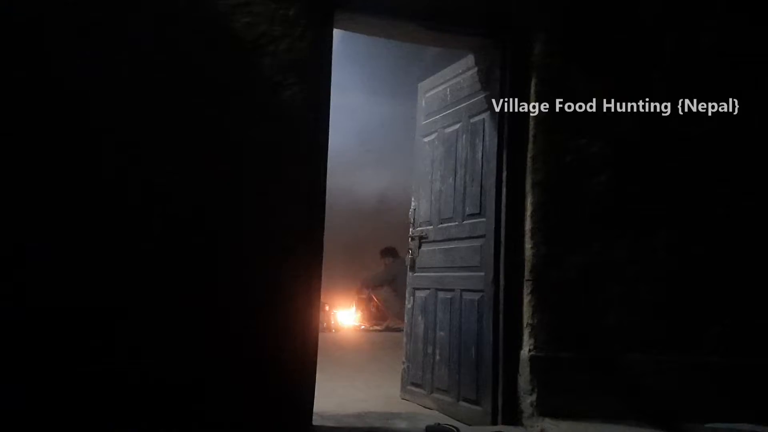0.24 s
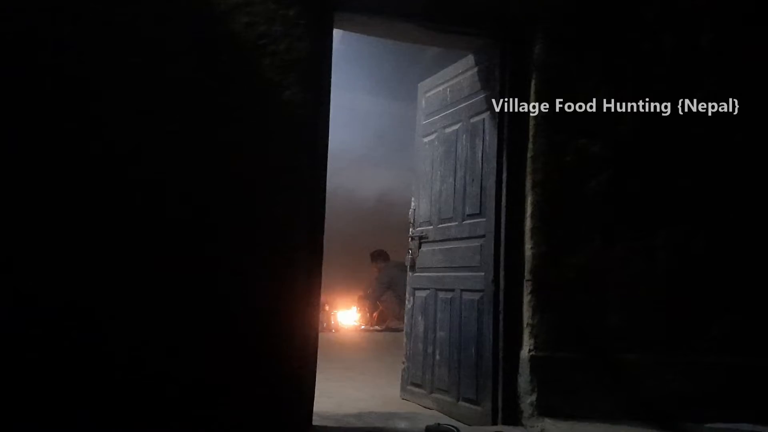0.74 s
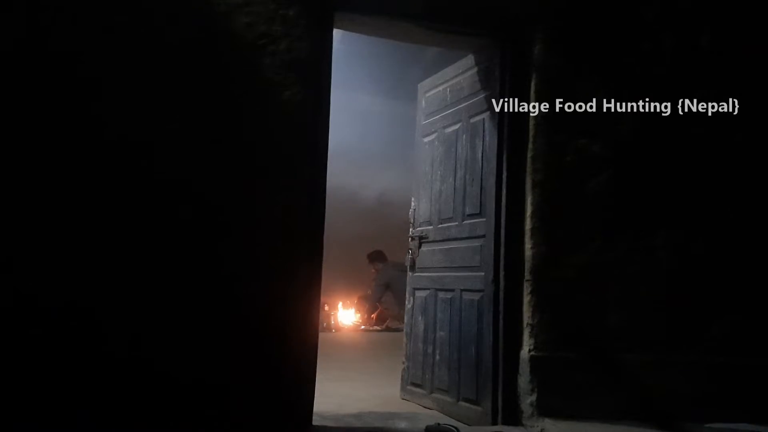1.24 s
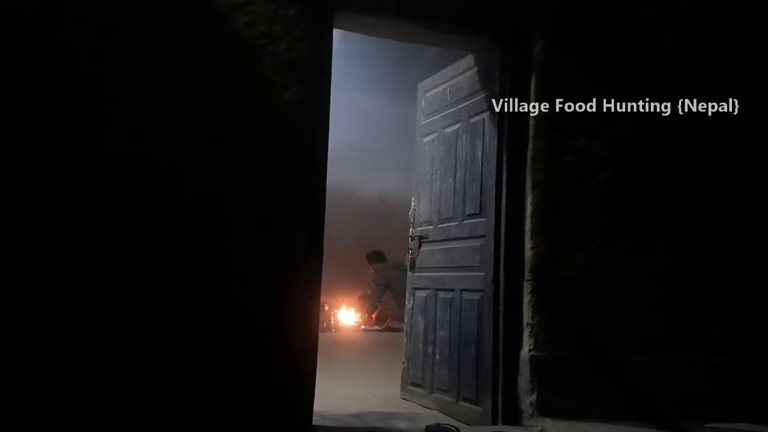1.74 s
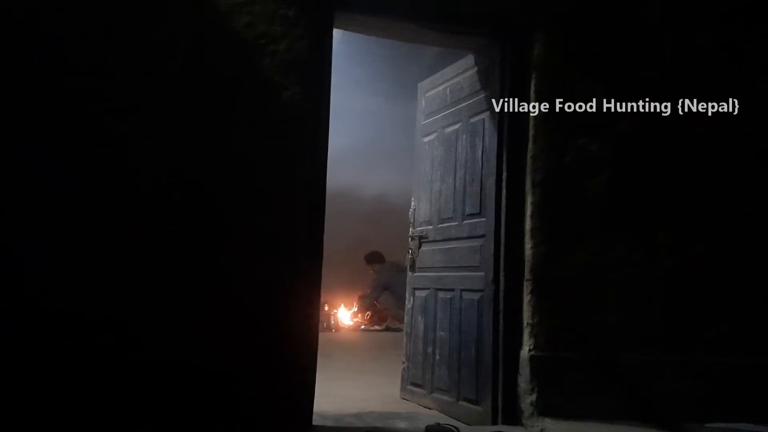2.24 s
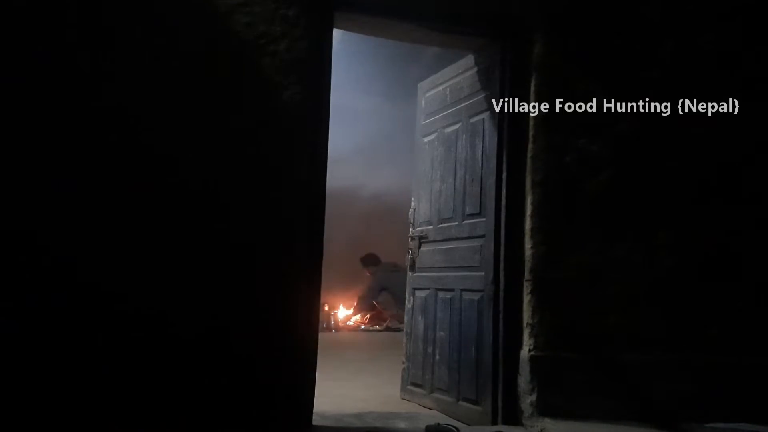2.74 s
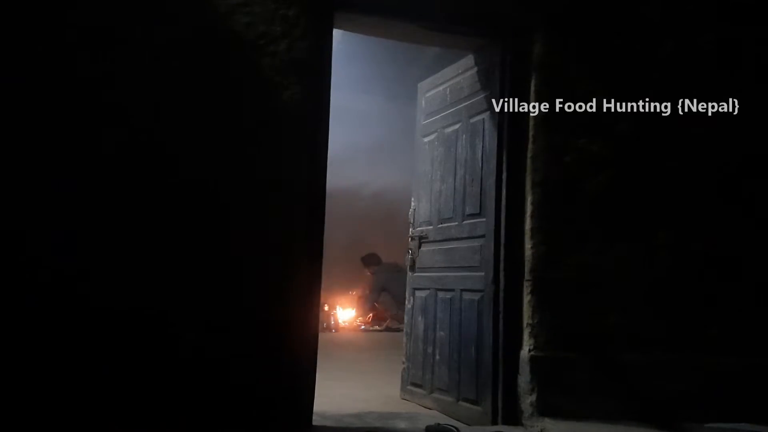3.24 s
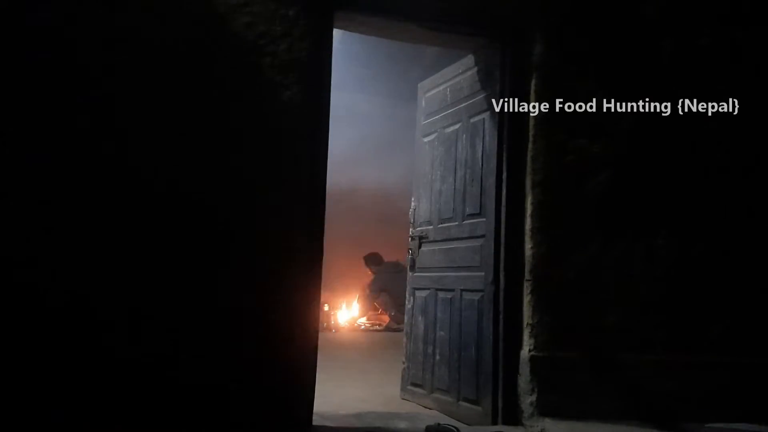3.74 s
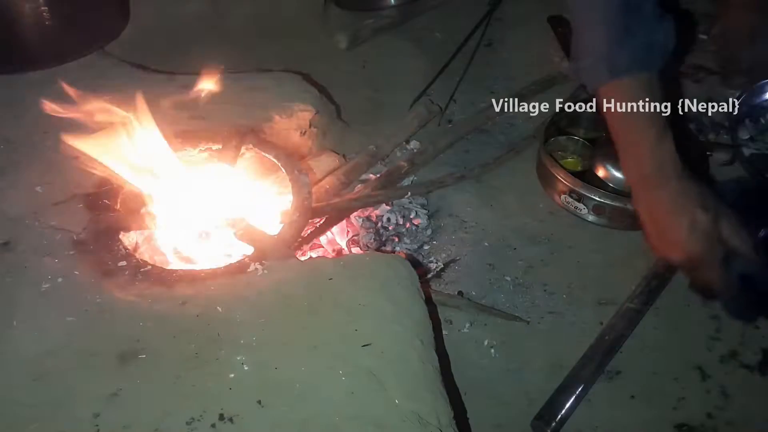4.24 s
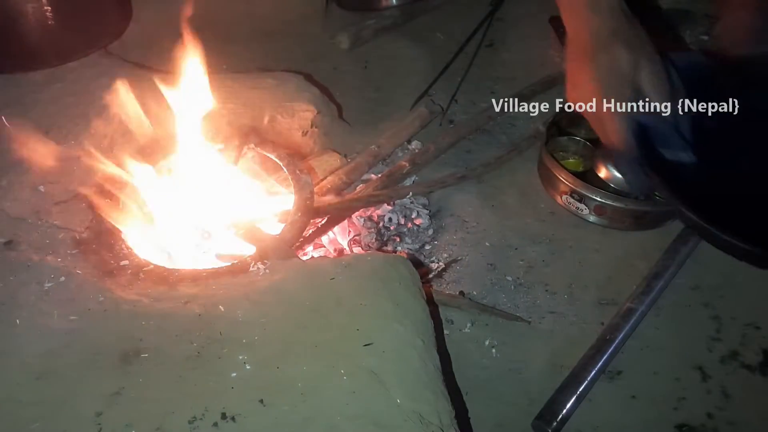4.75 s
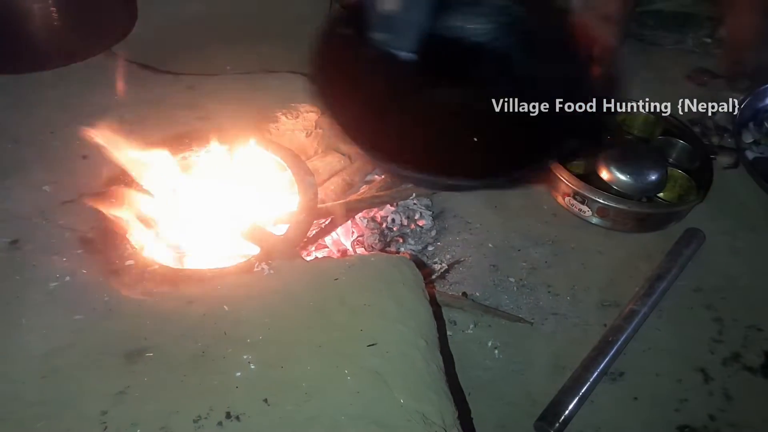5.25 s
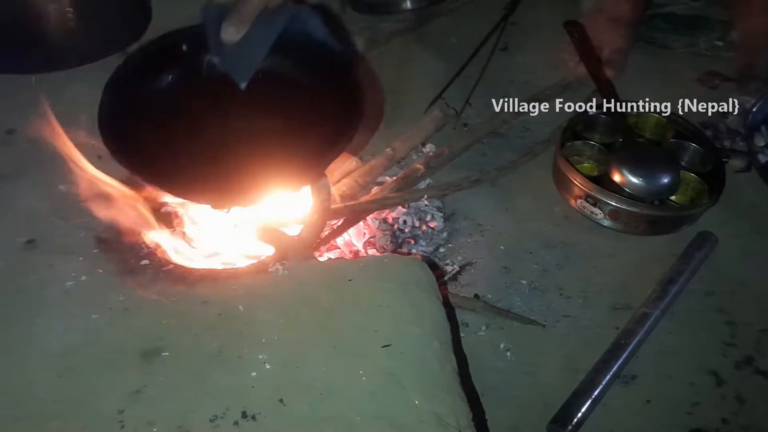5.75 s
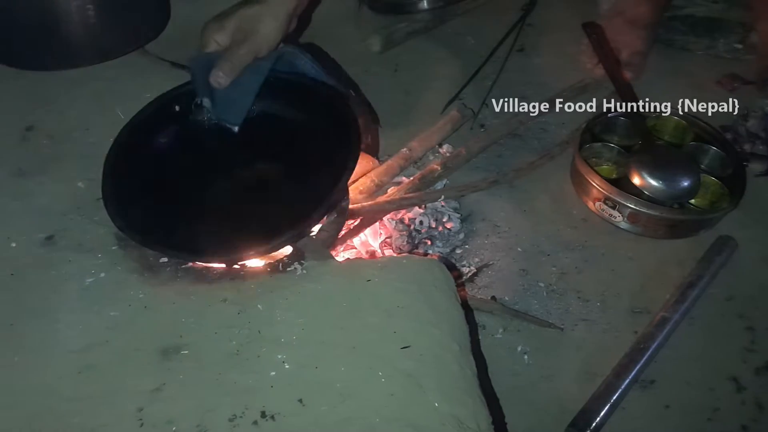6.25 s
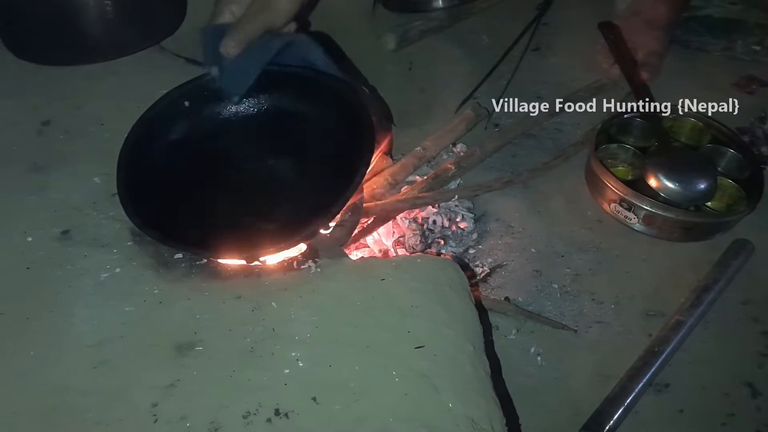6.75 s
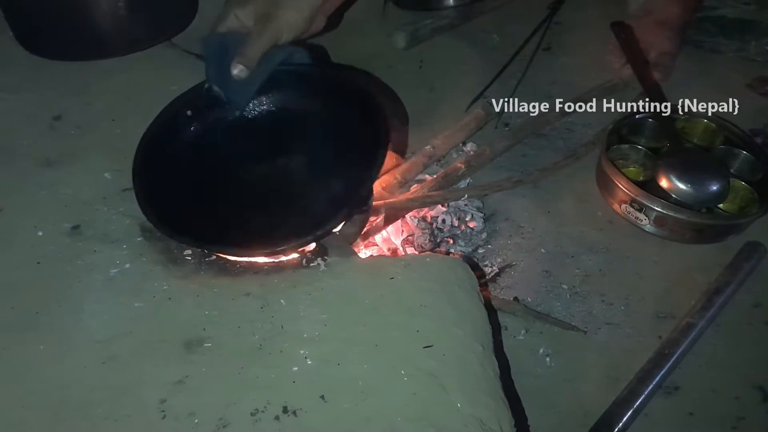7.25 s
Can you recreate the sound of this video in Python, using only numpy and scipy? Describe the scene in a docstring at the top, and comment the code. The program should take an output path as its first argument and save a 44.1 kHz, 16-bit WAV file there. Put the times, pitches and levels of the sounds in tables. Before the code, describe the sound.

Three listening places follow with hard cuts. First a moment of loud hissing at the pot; then distant, very faint fire under chirping crickets, with scattered crackles and soft bumps; last, close hissing flames. There an ember snaps loudly, a pan swishes as it is lifted, then knocks hollowly on the stove, rasps and sings in short drags. Stereo pickup outdoors at night, then near in a small earthen kitchen.

```python
"""A wood fire in a clay kitchen at night, heard from three places: beside the hissing pot, outside the
door with crickets over the faint fire, then close to the flames, where an ember cracks and an iron pan is
swung over, set down and dragged. Fire, rustle and thuds are shaped noise, crickets sliding sine strokes,
pops noise bursts in a room; grit clicks and blows ring the modes of the pan, which also sings."""
import sys
import numpy as np
from scipy import signal
from scipy.fft import rfft, irfft, next_fast_len
from scipy.io import wavfile
from scipy.ndimage import uniform_filter1d

SR = 44100
rng = np.random.default_rng(int(sys.argv[2]) if len(sys.argv) > 2 else 0)


def to_wav(sig):
    """Store sig (one row per channel, or 1-D mono) as 16-bit WAV at the path in sys.argv[1].

    Samples outside -1..1 are clipped; the rate is SR.
    """
    pcm = np.clip(np.atleast_2d(sig), -1, 1) * 32767
    pcm = np.round(pcm).astype(np.int16)
    wavfile.write(sys.argv[1], SR, pcm.T)  # frames by channels


N = 330730
T = np.arange(N) / SR  # time [s]
M = next_fast_len(N + 8192)  # transform length, padded for tails
HZ = np.maximum(np.arange(M // 2 + 1) * SR / M, 1)  # spectral lines [Hz]

CLOSE_END_S, NEAR_START_S = 0.079, 4.223  # the listening place changes
ROOM_T60_S, ROOM_GAP_S = 0.23, 0.0028  # usual decay, and the silence before the first reflection
EAR_LAG = 9  # samples by which the pan reaches the right ear later


def undb(db):
    """Decibels to gain."""
    return 10 ** (np.asarray(db) / 20)


def unit(x):
    """Scale to rms 1."""
    return x / np.sqrt(np.mean(x ** 2))


def over_hz(table):
    """A (frequency [Hz], value) table read at every spectral line, on a log frequency axis."""
    hz, value = np.transpose(table)
    return np.interp(np.log(HZ), np.log(hz), value)


def colour(x, table, lo_hz=1, hi_hz=3e4):
    """Shape by a spectrum, keeping one band of it."""
    keep = 1 / np.sqrt((1 + (lo_hz / HZ) ** 12) * (1 + (HZ / hi_hz) ** 12))
    return irfft(rfft(x, M) * undb(over_hz(table)) * keep, M)[..., :N]


def band_only(x, lo_hz=1, hi_hz=3e4):
    """Keep one band, with a flat spectrum inside it."""
    return colour(x, [(1, 0), (SR, 0)], lo_hz, hi_hz)


def gains(rows):
    """Level columns of a curve as gains in time; silent outside it."""
    s, *columns = np.transpose(rows)
    return [undb(np.interp(T, s, c, -200, -200)) for c in columns]


def held(table, start_s, end_s):
    """Gains of a curve between two times, its end values held; silent outside them."""
    s, *columns = np.transpose(table)
    return [undb(np.interp(T, s, c)) * (T >= start_s) * (T < end_s) for c in columns]


def walk(rate):
    """Random levels held 1 / rate s and slewed twice; spread near 1."""
    k = int(SR / rate)
    steps = np.repeat(rng.standard_normal(N // k + 1), k)
    return 1.33 * uniform_filter1d(uniform_filter1d(steps, k), k)[:N]


# likeness of the two ears: (frequency [Hz], correlation)
EAR_LIKENESS = [(60, 0.75), (250, 0.52), (640, 0.21), (1400, -0.1), (3000, 0.087), (15000, -0.046)]


def pair(a, b):
    """Spectra of left and right from two unrelated signals, alike mostly in the bass."""
    c = np.clip(over_hz(EAR_LIKENESS), -1, 1)
    mid = rfft(a, M) * np.sqrt((1 + c) / 2)
    side = rfft(b, M) * np.sqrt((1 - c) / 2)
    return np.array([mid + side, mid - side])


def ring(x, hz, t60):
    """One decaying mode; a unit click rings with amplitude near 1."""
    r, w = np.exp(-np.log(1000) / (t60 * SR)), 2 * np.pi * hz / SR
    return signal.lfilter([0, r * np.sin(w)], [1, -2 * r * np.cos(w), r * r], x)


def add(out, s, piece):
    """Mix a piece in at a time."""
    i = int(s * SR)
    out[..., i:i + piece.shape[-1]] += piece[..., :N - i]


def room(x, t60=ROOM_T60_S):
    """Diffuse answer of the walls as decaying noise, energy near 1, different at each ear."""
    t = T[:SR // 2]
    decay = undb(-60 * t / t60) * (t > ROOM_GAP_S)
    tail = rng.standard_normal((2, N)) * np.pad(decay, (0, N - len(t)))
    return irfft(rfft(x, M) * pair(*tail), M)[:, :N] / np.sqrt(np.sum(tail[0] ** 2))


def air(flicker_db, sputter_db):
    """White stereo noise whose half-octave bands flicker alone and sputter together."""
    both, out, sputter = pair(*rng.standard_normal((2, N))), 0, walk(30)
    for octave in np.arange(4, 14.6, .5):
        share = np.cos(np.pi * np.clip(np.log2(HZ) - octave, -.5, .5)) ** 2
        level = undb(flicker_db * walk(10) + sputter_db * sputter)
        out = out + level * irfft(both * share, M)[:, :N]
    return out


def patchy(x, depth_db, width_hz, life_s):
    """Narrow bands, mostly above 2 kHz, flare and fade at random, so that the colour keeps shifting."""
    cells = signal.stft(x, nperseg=256)[2]
    field = rng.standard_normal(cells.shape[-2:])
    for axis, size in enumerate((width_hz * 256 / SR, life_s * SR / 128)):
        size = max(int(size), 1)
        field = uniform_filter1d(uniform_filter1d(field, size, axis), size, axis)
    treble = np.minimum(np.linspace(0, SR / 2, len(field)) / 2000, 1)[:, None]
    return unit(signal.istft(cells * undb(depth_db * treble * unit(field)))[1][..., :N])


# hiss of steam and burning sap beside the pot, outside the door and near the flames:
# (time [s], level of the lower band [dB], level of the upper band [dB]), split near 8.5 kHz
POT_HISS = [(0.0, -27, -31.5), (0.075, -25.5, -32)]
DOOR_HISS = [(0.09, -60, -68), (0.38, -58.5, -64), (0.7, -61.5, -69.5), (0.92, -61, -60), (1.1, -59, -67),
             (1.59, -64.5, -70), (2.38, -61, -70.5), (4.21, -59.5, -69.5)]
NEAR_HISS = [(4.235, -41, -43), (4.37, -41.5, -45), (4.52, -44.5, -46), (4.72, -42.5, -44.5),
             (4.97, -39, -41), (5.2, -42, -43.5), (5.5, -41, -43), (5.95, -43.5, -44.5),
             (6.44, -43.5, -43.5), (6.95, -41.5, -44), (7.0, -38, -40.5), (7.2, -38.5, -40),
             (7.455, -41, -44)]
# colour of the hiss at each place: (frequency [Hz], relative density [dB per Hz])
POT_COLOUR = [(350, -30), (600, -33), (1110, -23), (1620, -9), (1830, -15), (2750, -11), (2980, -19),
              (3190, -12.5), (4540, -9.5), (6730, 0), (8830, -12.5), (14000, 3), (15400, -5)]
DOOR_COLOUR = [(350, -32), (600, -18.5), (706, -30), (1370, -18.5), (1730, -15), (2210, -11), (2400, -16),
               (3190, -11.5), (3800, 1.5), (4200, -5), (5270, -8), (6640, -5), (7810, -12), (9190, -33),
               (14000, -25), (15400, -34.5)]
NEAR_HISS_COLOUR = [(350, -22.5), (600, -20.5), (1360, -24), (2090, -21.5), (2460, -16.5), (2820, -21.5),
                    (3510, -11), (3750, -7.5), (4480, -4.5), (6120, 2), (7710, -6), (8710, -15),
                    (9450, -16.5), (13600, -2), (15400, -12)]
# fluttering flames away from and near the fire: (time [s], level [dB])
DISTANT_FLAMES = [(0.09, -61.5), (0.42, -62), (2.28, -61.5), (4.21, -62.5)]
NEAR_FLAMES = [(4.23, -62), (4.31, -52), (4.45, -65.5), (4.74, -52.5), (4.94, -63), (5.6, -58.5),
               (6.3, -65.5), (7.09, -61.5), (7.5, -58)]
# their colours: (frequency [Hz], relative density [dB per Hz])
DISTANT_FLAME_COLOUR = [(12, -62), (20, -34), (27, -32), (41, -15.5), (65, 3), (102, -13), (133, -6.5),
                        (163, -12), (270, -10.5), (424, -17.5), (1500, -30), (1950, -58), (3300, -120)]
NEAR_FLAME_COLOUR = [(12, -53), (20, -24), (43, -13), (70, -4), (122, -0.5), (175, -9.5), (260, -3.5),
                     (306, -9), (517, -22), (1500, -59), (1950, -57), (3300, -120)]
HISS_PATCH_DB, HISS_PATCH_HZ, HISS_PATCH_S = 2.6, 250, .045  # depth, width and life of the patches


def fire():
    """Hiss in two bands and flutter of the flames: turbulent noise coloured by the listening place."""
    noise, out = patchy(air(.8, 1.1), HISS_PATCH_DB, HISS_PATCH_HZ, HISS_PATCH_S), 0
    places = ((POT_HISS, POT_COLOUR, 0, CLOSE_END_S),
              (DOOR_HISS, DOOR_COLOUR, CLOSE_END_S, NEAR_START_S),
              (NEAR_HISS, NEAR_HISS_COLOUR, NEAR_START_S, N / SR))
    for curve, tone, start_s, end_s in places:
        low, high = held(curve, start_s, end_s)
        out = out + low * unit(colour(noise, tone, hi_hz=8450))
        out = out + high * unit(colour(noise, tone, lo_hz=8530))
    far, = held(DISTANT_FLAMES, 0, NEAR_START_S)
    near, = held(NEAR_FLAMES, NEAR_START_S, N / SR)
    flap = undb(1.2 * walk(35))  # close by, the flames flap in short gusts
    out = out + far * unit(colour(noise, DISTANT_FLAME_COLOUR))
    return out + near * unit(flap * colour(noise, NEAR_FLAME_COLOUR))


# dull thuds in the house and puffs of flame:
# (time [s], relative level [dB], pitch [Hz], decay t60 [s])
THUDS_AND_PUFFS = [(0.085, -30, 445, 0.039), (0.618, -52, 440, 0.12), (0.882, -30.5, 234, 0.1),
                   (1.624, -48, 300, 0.08), (2.197, -54, 640, 0.1), (3.414, -38.5, 340, 0.044),
                   (4.23, -45.5, 227, 0.14), (4.553, -33, 240, 0.052), (4.589, -43.5, 112, 0.19),
                   (4.982, -49.5, 141, 0.52), (5.339, -50, 116, 0.28)]


def thuds():
    """Soft blows: a short puff of low noise around one pitch, spreading weakly above it."""
    out, t = np.zeros(N), T[:SR // 4]
    puffs = rng.standard_normal((len(THUDS_AND_PUFFS), SR // 4))
    for (s, db, hz, t60), puff in zip(THUDS_AND_PUFFS, puffs):
        blow = unit(ring(puff, hz, 0.04))
        blow = blow + 0.45 * unit(ring(puff, 1.4 * hz, 0.02)) + 0.2 * unit(ring(puff, 2.2 * hz, 0.01))
        envelope = np.minimum(t / 0.029, 1) * undb(-60 * t / t60)
        add(out, s - .005, undb(db + 3.0) * blow * envelope)
    return out + undb(-7.5) * room(out)


CRICKET_HZ, CRICKET_SLIDE_HZ = 3776, 280  # pitch of full strokes, and how far a stroke slides down
RISE_HZ_PER_DB = 9.5  # soft opening strokes lie lower
STROKE_S, NEIGHBOUR_S = 0.017, 0.013  # stroke lengths
RUN_UP = 7  # quick strokes that open a trill; their gaps widen and their level climbs
QUICK_GAP_S, WIDEN_S, WIDEN_STROKES = 0.028, 0.012, 1.5
SLOW_GAP_S, SLOWING_S = 0.0514, .0008  # slow gaps, each longer than the one before by the second
SOFT_START_DB, CLIMB_STROKES, STROKE_SCATTER_DB = -18, 3.0, -0.3


def stroke(hz, length, turn):
    """One wing stroke: it swells, slides down in pitch and stops short; its phase lags at the right ear."""
    u = np.linspace(0, 1, int(length * SR))
    turns = np.cumsum(hz + CRICKET_SLIDE_HZ * (.5 - u)) / SR + turn
    phase = 2 * np.pi * turns - np.array([[0], [1.8]])
    return np.sin(np.pi * u ** 1.6) ** 0.83 * np.sin(phase)


def trill(first_s, last_s, pace):
    """Times and relative levels of the strokes of one trill: a quick run-up, then slow strokes."""
    back = np.arange(RUN_UP)
    gaps = QUICK_GAP_S + WIDEN_S * np.exp(-back / WIDEN_STROKES)
    run_up = first_s - pace * np.cumsum(gaps)[::-1]
    k = np.arange(round(abs(last_s - first_s) / SLOW_GAP_S) + 1)
    slow = np.linspace(first_s, last_s, len(k)) - SLOWING_S / 2 * k * k[::-1]
    times = np.append(run_up, slow)
    return times, SOFT_START_DB * np.exp(-np.arange(len(times)) / CLIMB_STROKES)


# trills of the main cricket: (first slow stroke [s], last slow stroke [s],
# stretch of the run-up [1 = usual], relative level [dB])
CRICKET_TRILLS = [(0.833, 1.092, 1.05, -33.5), (1.945, 2.301, 1.0, -35), (3.231, 3.437, 1.11, -34.5),
                  (4.31, 4.31, 1.0, -37)]
# clear strokes of neighbouring crickets:
# (time [s], relative level [dB], middle pitch [Hz], left minus right [dB])
NEIGHBOUR_STROKES = [(0.1082, -63, 3510, -3.0), (0.1786, -57, 3620, 0), (0.4529, -58, 3820, -6),
                     (0.4788, -58, 3850, -2.5), (0.5018, -58, 3860, -4.5), (0.5253, -57, 3900, -5.5),
                     (0.5497, -60, 3900, -5.5), (0.5826, -59, 3880, -4), (1.1926, -57, 3570, 1.5),
                     (1.2415, -60, 3750, -3.0), (1.2914, -57, 3570, -2.0), (1.3313, -57, 3920, 0.0),
                     (1.3573, -58, 3940, -2.5), (1.3887, -57, 3880, -5), (1.4331, -53, 3660, 2.5),
                     (1.46, -56, 3910, -2.5), (1.481, -54, 3650, 0.0), (1.5074, -58, 3860, -2),
                     (1.5498, -57, 3980, -6), (1.5912, -58, 3900, -3.5), (1.6187, -64, 3820, -4.0),
                     (2.3816, -52, 3690, 0.5), (2.4135, -56, 3880, -3), (2.4593, -61, 3850, -1.0),
                     (2.4927, -55, 4000, -7), (2.5414, -54, 3800, -0.5), (2.5844, -52, 3910, -0.5),
                     (2.6106, -54, 3650, 3.5), (2.656, -54, 3650, 6), (2.7053, -57, 3610, 0.0),
                     (2.7792, -59, 3650, -3.0), (3.4867, -53, 3700, 8), (3.5446, -52, 3500, 3),
                     (3.5805, -57, 3772, 0.5), (3.6359, -54, 3510, 3), (3.6768, -59, 3610, 1),
                     (3.7147, -60, 3520, 4.0), (3.8209, -59, 3780, -2.5), (3.8618, -54, 3780, -0.5),
                     (3.8933, -54, 3850, -2.5), (3.9536, -55, 3900, -7), (3.9876, -58, 3990, -4.5),
                     (4.0265, -62, 3900, -3), (4.0552, -58, 4040, 1)]
# crickets further off, and a higher insect band: (time [s], crickets [dB], higher band [dB])
CHORUS_LEVELS = [(.1, -71, -71), (.4, -81, -63), (.6, -62, -74), (.9, -54, -67), (1.0, -62, -71),
                 (1.14, -65, -59), (1.22, -63, -67), (1.68, -63, -68), (2.1, -55, -65.5),
                 (2.55, -61.5, -66), (2.85, -81, -76), (3.0, -61, -71), (3.19, -53.5, -59),
                 (3.28, -52, -68), (3.43, -57, -62), (3.6, -74, -86), (4.2, -55.5, -71)]
CHORUS_RATE_HZ, HIGH_RATE_HZ = 90, 400  # strokes per second
HIGH_HZ, HIGH_SPREAD_HZ = 4646, 520
ECHO_S, ECHO_DB = .031, -11  # a wall throws the trill back


def chorus(rate_hz, hz, spread_hz, size_db, length_s):
    """Five seconds of overlapping wing strokes at random times, levels and pitches."""
    out = np.zeros((2, N))
    for k, (late, size, bend, turn) in enumerate(rng.random((int(5 * rate_hz), 4))):
        one = stroke(hz + spread_hz * (bend - .5), length_s, turn)
        add(out, (k + late) / rate_hz, undb(size_db * size) * one)
    return out


def crickets():
    """One cricket trills by wing strokes, neighbours answer; a far chorus is mostly heard off the walls."""
    near = np.zeros((2, N))
    for first_s, last_s, pace, peak_db in CRICKET_TRILLS:
        for s, db, (bend, turn, size) in zip(*trill(first_s, last_s, pace), rng.random((20, 3))):
            hz = CRICKET_HZ + RISE_HZ_PER_DB * db + 60 * (bend - .5)
            level = undb(peak_db + db + STROKE_SCATTER_DB * (size + 8.0))
            add(near, s - .0075, level * stroke(hz, STROKE_S, turn))
    add(near, ECHO_S, undb(ECHO_DB) * near[::-1].copy())  # the echo swaps the ears
    for (s, db, hz, pan_db), turn in zip(NEIGHBOUR_STROKES, rng.random(len(NEIGHBOUR_STROKES))):
        level = undb(db + 2.0 + np.array([[pan_db], [-pan_db]]) / 2)
        add(near, s - .003, level * stroke(hz, NEIGHBOUR_S, turn))
    far = chorus(CHORUS_RATE_HZ, CRICKET_HZ, 480, 4, 0.0102)
    high = chorus(HIGH_RATE_HZ, HIGH_HZ, HIGH_SPREAD_HZ, 7.7, 0.004)
    out = near + undb(-12) * room(near[0], 0.25)
    for gain, x in zip(held(CHORUS_LEVELS, 0, N / SR), (far, high)):
        x = x + undb(6.5) * room(x[0], 0.14)
        out = out + gain * x / np.sqrt(np.mean(x[:, :4 * SR] ** 2))
    return out * (T >= CLOSE_END_S) * (T < NEAR_START_S)  # heard only from outside the door


# embers that pop: (time [s], relative level [dB], mids [relative dB], room share [relative dB],
# band above 9 kHz [relative dB], decay t60 [s])
EMBER_POPS = [(0.2477, -25, -31, -2, -16, 0.009), (0.422, -42, -37, 6, -8, .04),
              (0.505, -43, -40, 0, -8, .03), (0.7484, -45.5, -35, -6, -1, .04),
              (0.803, -43, -40, 3, -8, .04), (1.9094, -51.5, -37, 2, 6.5, 0.037),
              (1.974, -54, -36, 3, 5, .04), (2.052, -55, -24, -7, 0, .04),
              (2.3924, -48.5, -31, -1, -2, .04), (2.426, -47.5, -40, 1, -1, .04),
              (2.493, -39.5, -48, 2, -2, .03), (2.895, -34, -46, 2, -9, 0.022),
              (3.148, -45.5, -22, 0, 0, .04), (3.1921, -45.5, -36, 4, -0.5, .04),
              (3.608, -51.5, -35, 12, -7, 0.044), (3.8077, -63, -8, 1, 0, .04),
              (3.9025, -48, -26, -1, 6, 0.03), (4.3072, -1, -23, -5.5, 3, 0.0092),
              (5.1103, -39, -34, -7, 0, .006), (5.277, -19, -44, -9, -6, .006),
              (5.7707, -27, -45, -16, 4, .006), (7.166, -20, -45, -10, 0, .006)]
# colour of a pop: (frequency [Hz], relative density [dB per Hz])
EMBER_COLOUR = [(350, -69), (900, -33), (1640, -12.5), (2660, -6.5), (3210, -10.5), (4850, -6),
                (6130, -18.5), (7400, -2.5), (9190, -24), (13400, -12.5), (15400, -15.5)]
# dull ticks in the logs: (time [s], relative level [dB])
LOG_TICKS = [(4.253, -42.5), (4.283, -37.5)]


def pops():
    """Embers burst as short decaying noise in three bands, each answered by the room; logs tick dully."""
    dry, wet, t = np.zeros((3, 2, N)), np.zeros((3, N)), T[:1500]
    bursts = rng.uniform(-1.82, 1.6, (len(EMBER_POPS), 2, 1500))
    for (s, db, mid_db, room_db, top_db, t60), burst in zip(EMBER_POPS, bursts):
        crack = undb(db) * burst * undb(-60 * t / t60)
        add(dry[0], s, crack)
        add(dry[1], s + 0.0011, undb(mid_db + 16.0) * crack)  # the mids speak a little later
        add(dry[2], s, undb(top_db) * crack)
        add(wet, s, undb([[room_db], [room_db + mid_db + 21.5], [room_db + top_db]]) * crack[0])
    bright = colour(dry[0] + room(wet[0], 0.14), EMBER_COLOUR, 5800, 8700)
    top = colour(dry[2] + room(wet[2], 0.21), EMBER_COLOUR, lo_hz=9240)
    mids = colour(dry[1] + room(wet[1], 0.17), EMBER_COLOUR, 1100, 4500)
    ticks = np.zeros(N)
    for s, db in LOG_TICKS:
        add(ticks, s, undb(db + 9.5) * np.ones(1))
    return undb(8) * (bright + top + mids) + ring(ticks, 2300, 0.00086)


# a dry rustle that rises in pitch: (time [s], level [dB], centre [Hz])
RISING_RUSTLE = [(.995, -75, 3020), (1.0, -57, 3100), (1.03, -61, 4920), (1.1, -58, 5100),
                 (1.12, -54, 6250), (1.17, -59, 6540), (1.2, -61, 6540), (1.24, -80, 6820)]


def rustle():
    """Grainy noise: low-passed noise carried on a tone that slides upwards."""
    s, db, hz = np.transpose(RISING_RUSTLE)
    lowpass = signal.butter(2, 550, fs=SR, output="sos")
    spread = signal.sosfilt(lowpass, rng.standard_normal((2, 2, N)))
    turn = 2 * np.pi * np.cumsum(np.interp(T, s, hz)) / SR
    band = unit(spread[0] * np.cos(turn) + spread[1] * np.sin(turn))
    return undb(np.interp(T, s, db, -200, -200) + 2.4 * walk(86.2)) * band


def body(x, modes, lo_hz, hi_hz):
    """Ring the modes that lie in a band, dark outside it; rms 1."""
    rung = 0
    for hz, width, db in modes:
        if lo_hz < hz < hi_hz:
            t60 = np.log(1000) / (np.pi * width)
            rung = rung + ring(x, hz, t60) * np.sqrt(width) * undb(db)
    return unit(band_only(rung, lo_hz, hi_hz))


# iron scrapes on clay: (time [s], swell [s], hold [s], fade t60 [s],
# bowl rumble [dB], hollow ring [dB], rim ring [dB], bright rasp [dB])
PAN_SCRAPES = [(5.973, 0.0052, 0.036, 0.33, -51, -62, -51, -46.5),
               (6.025, 0.022, 0.095, 0.32, -63, -60, -51, -44),
               (6.181, 0.0018, 0.0054, 0.05, -38, -45, -47, -27.5),
               (6.196, 0.0044, 0.0061, 0.037, -33, -36.5, -34, -29),
               (6.208, 0.0045, 0.018, 0.19, -35.5, -40.5, -40.5, -37),
               (6.244, 0.013, 0.017, 0.097, -27.5, -32.5, -46, -39),
               (6.28, 0.0028, 0.0076, 0.088, -32, -38, -59, -28),
               (6.297, 0.0078, 0.0095, 0.073, -34.5, -46, -34, -27),
               (6.324, 0.0087, 0.029, 0.15, -38, -55.5, -45, -35.5),
               (6.369, 0.0041, 0.011, 0.096, -44, -55, -51, -33.5),
               (6.521, 0.018, 0.012, 0.17, -65, -55, -41, -38),
               (6.585, 0.049, 0.019, 0.19, -56, -43, -36, -30),
               (6.641, 0.023, 0.0077, 0.13, -44.5, -40, -33.5, -29.5),
               (6.674, .012, .015, 0.2, -44, -42, -36, -32),
               (7.254, 0.003, 0.009, 0.087, -40, -41, -41, -34),
               (7.271, 0.0018, 0.0053, 0.068, -41, -46, -36, -26),
               (7.279, 0.0079, 0.006, .1, -35, -41, -32, -30.5),
               (7.293, 0.0033, 0.03, .15, -37, -44.5, -35, -32),
               (7.316, 0.015, 0.038, 0.23, -40, -41, -39, -31),
               (7.465, 0.0042, 0.025, .1, -32.5, -48, -48, -33),
               (7.476, 0.0025, 0.0055, 0.071, -44, -48, -42, -29)]
SWELL_DB = -13.5  # level at which a scrape sets in


def pressure():
    """Gains of the four parts of the pan: each scrape swells, holds and fades; their powers add."""
    power = 0
    for s, swell, hold, t60, *db in PAN_SCRAPES:
        t = T - s
        fade = -60 * np.maximum(t - swell - hold, 0) / t60
        shape = np.where(t < swell, SWELL_DB * (1 - t / swell), fade)
        power = power + np.outer(undb(db), undb(np.clip(shape, -200, 0)) * (t > 0)) ** 2
    return np.sqrt(power)


# modes of the pan's bowl, hollow and rim: (frequency [Hz], width [Hz], relative level [dB])
BOWL_MODES = [(151, 62, -10), (229.4, 5.3, -9.5), (260.7, 4.7, -9), (347.5, 55, -5.5), (449, 22, -15.5)]
HOLLOW_MODES = [(767, 70, -4), (785, 240, 4), (880, 75, -25), (1300, 250, -9), (1735, 100, -14),
                (2000, 57, -9)]
RIM_MODES = [(2587, 64, 3), (2790, 22, -3.5), (2894, 75, -3), (3110, 28, -2), (3300, 18, -3),
             (3510, 110, -4.5), (3660, 26, -16), (3880, 39, 0.5), (4250, 51, -1), (4420, 67, 1.5),
             (4850, 80, 5.5), (5150, 100, 7), (5680, 74, 6), (5840, 55, 2), (6520, 65, -1), (6860, 120, -2),
             (7960, 170, 3.5), (8820, 71, -7.5)]
# colour of the rasp: (frequency [Hz], relative density [dB per Hz])
RASP_SPECTRUM = [(880, -52), (1500, -38), (2240, -6), (2800, 12.5), (4470, -9), (5930, 11.5), (7790, 9),
                 (9280, 2), (13800, 0.5), (15400, -6)]
# the pan brushes over the floor as it is lifted:
# (time [s], level [dB], part below about 1.5 kHz [relative dB])
FLOOR_BRUSH = [(4.7, -85, -5), (4.78, -53, -16), (4.86, -51, -32), (4.93, -44.5, -29), (5.0, -41.5, 0),
               (5.078, -48.5, -6), (5.136, -64, 1), (5.2, -86, -10)]
# colour of the brush: (frequency [Hz], relative density [dB per Hz])
FLOOR_BRUSH_COLOUR = [(120, -38), (200, -5), (265, 6), (443, -11), (572, -1.5), (1180, -13.5), (2290, -8.5),
                      (3480, -15), (5000, -28), (6500, -42), (11000, -120)]
APART = .25  # strength of the part of the bowl's sound that is opposite at the two ears
GRIT_PATCH_DB, GRIT_PATCH_HZ, GRIT_PATCH_S = 3.5, 450, .02  # depth, width and life of the patches


def pan_drag():
    """Grit catches the iron in uneven clicks that ring its bowl and rim; a soft brush as it is lifted."""
    uneven = undb(2.2 * rng.exponential(size=N)) * undb(1.6 * walk(250))
    grit = rng.standard_normal((2, N)) * uneven
    grit = patchy(grit, GRIT_PATCH_DB, GRIT_PATCH_HZ, GRIT_PATCH_S)
    # the big bowl sends nearly one wave to both ears, a little later to the right
    left, right = grit[0] + APART * grit[1], grit[0] - APART * grit[1]
    close = np.array([left, np.roll(right, shift=EAR_LAG)])
    rumble, hollow, rim, bright = pressure()
    low = rumble * body(close, BOWL_MODES, 100, 520) + hollow * body(close, HOLLOW_MODES, 600, 2300)
    rasp = body(grit, RIM_MODES, 3500, 13500) * undb(-1.5)
    rasp = rasp + unit(colour(grit, RASP_SPECTRUM, lo_hz=3750))
    brush, below = gains(FLOOR_BRUSH)
    soft = irfft(pair(*rng.standard_normal((2, N))), M)[:, :N]
    soft = soft * undb(1.15 * walk(60) + 2.2 * rng.exponential(size=N))
    swish = unit(colour(soft, FLOOR_BRUSH_COLOUR, 1310, 4900))
    swish = swish + below * unit(colour(soft, FLOOR_BRUSH_COLOUR, 210, 1550))
    ringing = rim * body(close, RIM_MODES, 2450, 3750)
    return low + ringing + bright * rasp + brush * swish


# dragged lightly, the pan sings on three thin tones, one curve per drag:
# (time [s], low tone [relative dB], middle tone [relative dB], high tone [relative dB])
SINGING_DRAGS = [
    [(5.965, -70, -80, -82), (5.983, -51, -49, -91), (5.995, -62, -49, -71), (6.019, -67, -60, -70),
     (6.067, -59, -57, -57), (6.101, -60, -48, -51), (6.125, -59, -43, -50), (6.157, -74, -71, -63),
     (6.16, -65, -68, -62)],
    [(6.53, -78, -66, -63), (6.548, -67, -48.5, -50), (6.564, -70, -47, -55), (6.59, -62, -56, -64),
     (6.638, -55, -46.5, -49), (6.662, -48, -40, -54), (6.696, -47, -43, -53), (6.716, -52, -39, -51),
     (6.76, -79, -74, -63)],
]
SINGING_HZ, SINGING_WAVER = (760, 2800, 3480), .009  # mean pitches, and share by which they waver


def singing():
    """Thin tones of the pan, kept ringing by the drag: sines whose pitch and level waver."""
    out = 0
    for k, hz in enumerate(SINGING_HZ):
        phase = 2 * np.pi * np.cumsum(hz * (1 + SINGING_WAVER * walk(40))) / SR
        level = sum(gains(drag)[k] for drag in SINGING_DRAGS)
        out = out + level * undb(1.0 + 4.6 * walk(90)) * np.sin(phase)
    return np.array([out, np.roll(out, shift=2)])


# the pan knocks on the stove:
# (time [s], relative level [dB], bowl boom [relative dB], rim tick [relative dB])
PAN_KNOCKS = [(5.976, -47, 0, 6), (6.184, -27.5, -2.5, -18), (6.244, -11.5, 2, -16), (6.257, -27, 9.5, -2),
              (6.318, -42, 21.5, 14), (7.258, -38, 14, 3), (7.274, -45, 26, 17), (7.4657, -21, -1, -31)]
KNOCK_HZ, KNOCK_S = 847, 0.004  # the short hollow clack of the contact


def knocks():
    """A hollow clack of the contact, a boom of the bowl modes that follows it, and a tick on the rim."""
    clack, push, tick = np.zeros((3, N))
    u = np.linspace(0, 1, int(KNOCK_S * SR))
    contact = np.sin(np.pi * u) * np.sin(2 * np.pi * KNOCK_HZ * KNOCK_S * u)
    for s, db, boom_db, tick_db in PAN_KNOCKS:
        add(clack, s - .0005, undb(db) * contact)
        add(push, s + 0.0019, undb(db + boom_db) * np.hanning(80) / 40)
        add(tick, s, undb(db + tick_db) * np.ones(1))
    boom = 0
    for hz, width, db in BOWL_MODES:
        t60 = 0.3 * np.log(1000) / (np.pi * width)  # the hand on the pan damps the free ring
        boom = boom + undb(db - 2.5) * ring(push, hz, t60)
    rim = sum(ring(tick, hz, 0.028) for hz, width, db in RIM_MODES)
    dry = clack + boom + undb(-11.5) * band_only(rim, lo_hz=2260)
    return np.array([dry, np.roll(dry, shift=EAR_LAG)]) + undb(-4.5) * room(dry)


def scene():
    """All sources together; blows carry no deep bass."""
    highpass = signal.butter(2, 90, "high", fs=SR, output="sos")
    blows = signal.sosfilt(highpass, knocks() + thuds())
    return fire() + crickets() + rustle() + pops() + pan_drag() + singing() + blows


# colour of the two microphone ports: (frequency [Hz], left minus right [dB])
PORT_DIFFERENCE = [(60, 4), (400, 2.5), (1300, 2.5), (2500, 1.7), (5200, -1), (7500, 7), (9000, 2.5),
                   (11000, -7.5), (13500, -6), (15300, -9.5)]
TOP_HZ = 15500  # upper limit of the sound


def record(dry):
    """The two microphone ports colour the sound differently; loud peaks are rounded and the top is cut."""
    tilt = undb(over_hz(PORT_DIFFERENCE) / 2)
    ported = irfft(rfft(dry, M) * np.array([tilt, 1 / tilt]), M)[:, :N]
    lowpass = signal.ellip(10, .2, 70, TOP_HZ, fs=SR, output="sos")
    return signal.sosfilt(lowpass, .9 * np.tanh(ported / .9))


dry = scene()
out = record(dry)
to_wav(out)
```